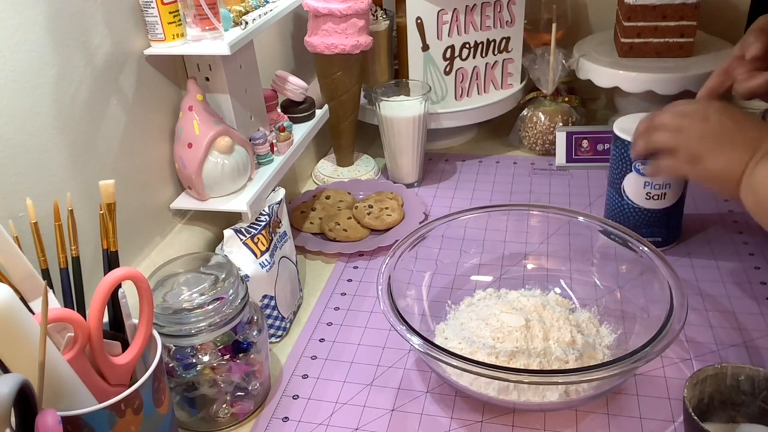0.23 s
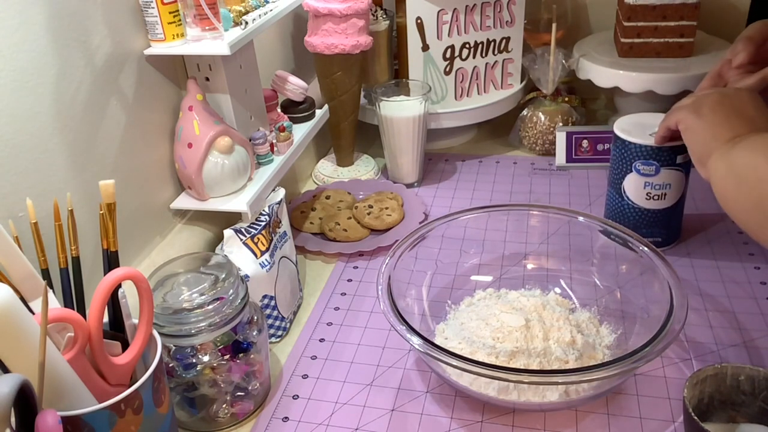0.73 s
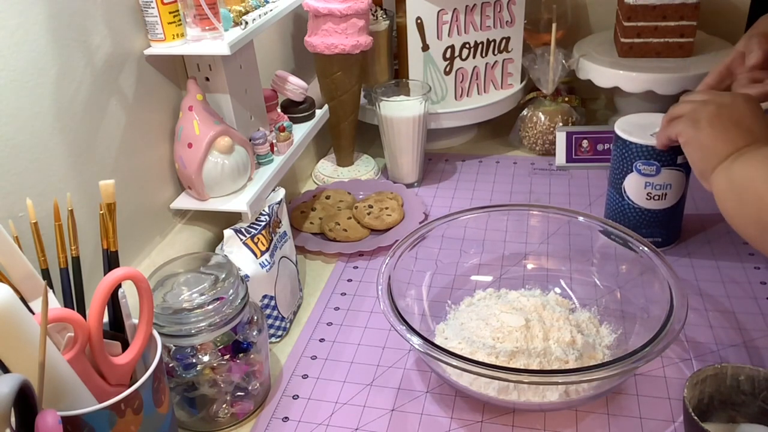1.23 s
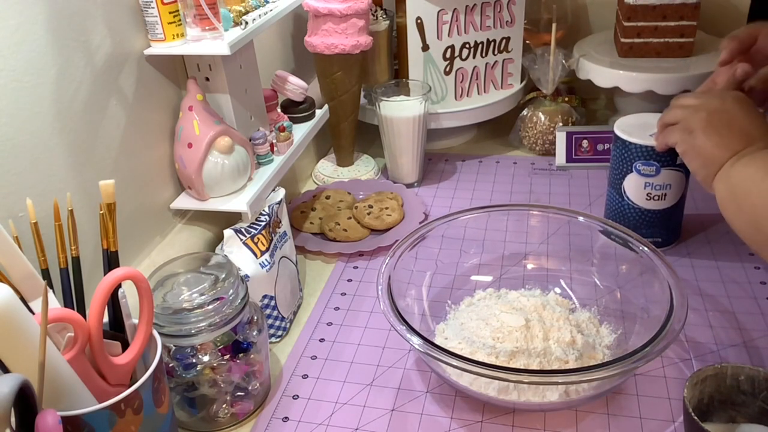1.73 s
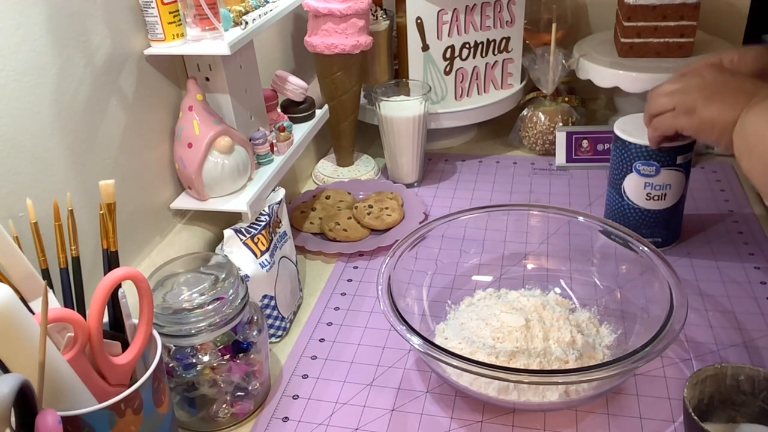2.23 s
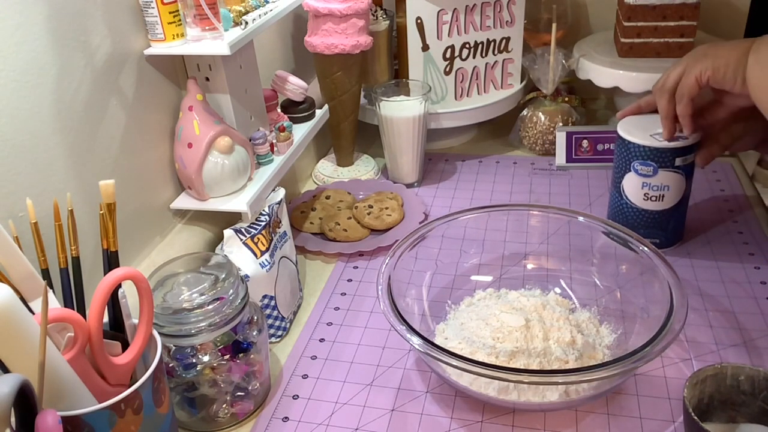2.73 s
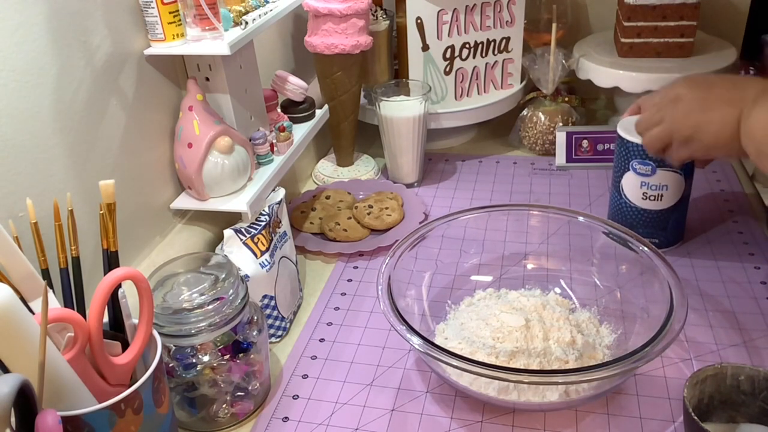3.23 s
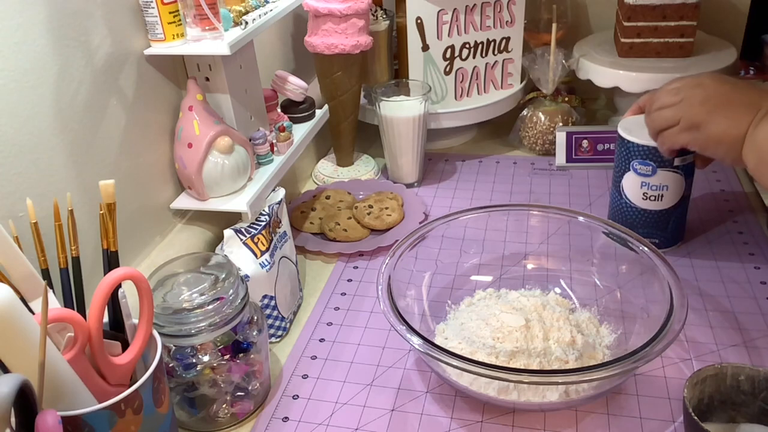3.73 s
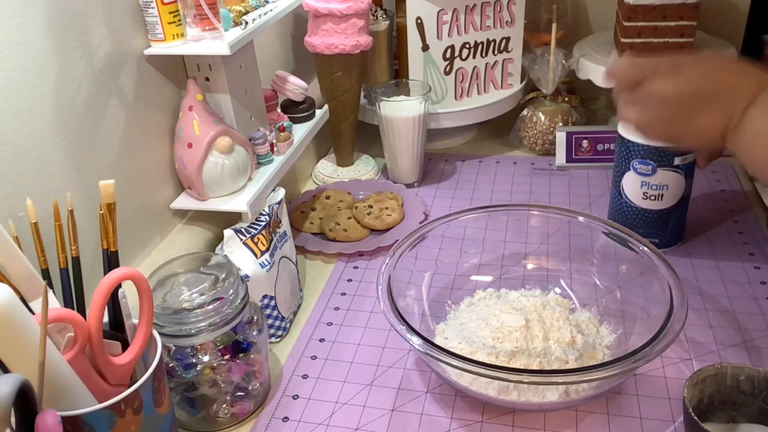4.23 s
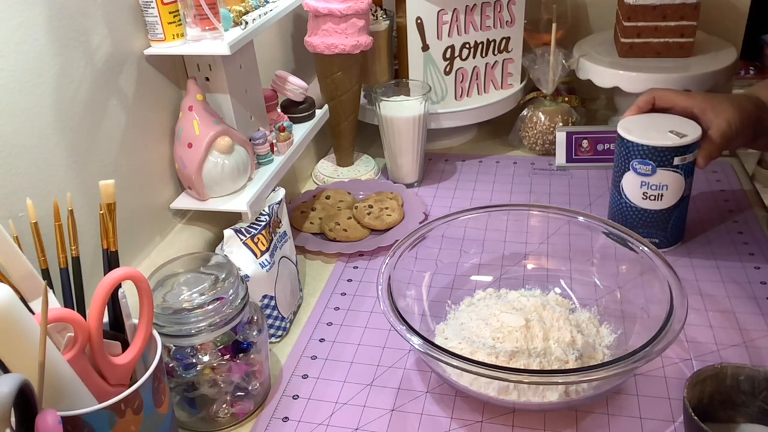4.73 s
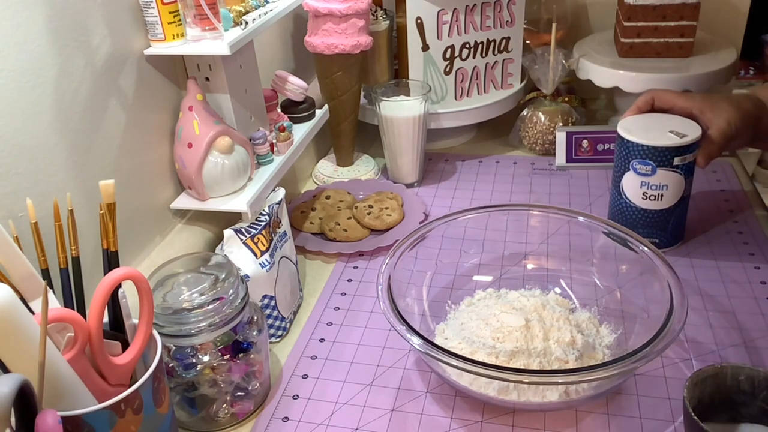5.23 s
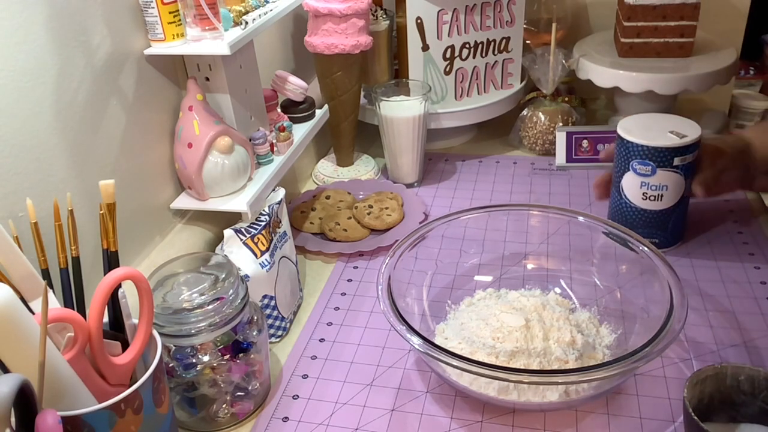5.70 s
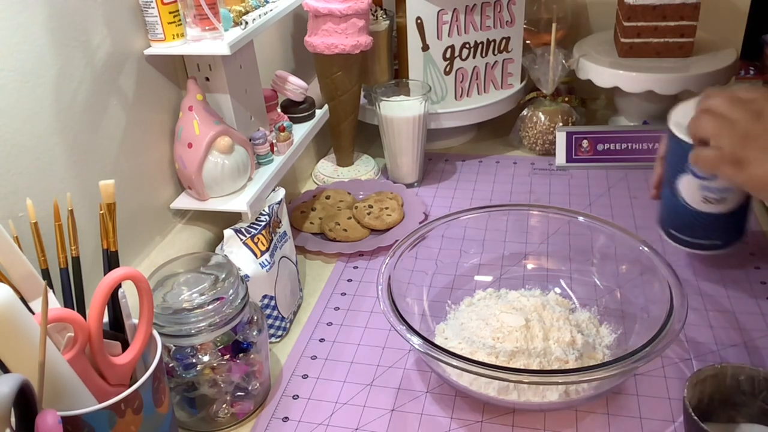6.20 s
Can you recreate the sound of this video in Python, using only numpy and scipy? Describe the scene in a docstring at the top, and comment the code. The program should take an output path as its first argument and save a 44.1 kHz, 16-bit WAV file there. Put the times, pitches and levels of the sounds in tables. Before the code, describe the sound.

Close in a small quiet room with a low hum, fingers brush faintly over a cardboard salt canister. Nails then pry at its metal spout: a cluster of sharp, bright snaps with hollow thumps near three seconds, more clicks and a scratch soon after, a lull, then a hard table knock with crisp ticks. It fades to near silence with one last faint touch.

```python
"""Fingernails pick at the metal spout of a cardboard salt canister on a craft table in a small quiet room.
Light finger strokes over lid and label come first, as noise of tiny slips through lid and drum resonances.
Then nails snap off the spout, bursts of crackle that make the hollow drum thump, with one short squeak
as a nail slips; among them the canister knocks on the table, as decaying modes, most sharply near the end.
A last faint stroke and knock close it. A low hum of shaped noise and two faint tones lie underneath."""
import sys
import numpy as np
from scipy import signal
from scipy.io import wavfile
from scipy.ndimage import uniform_filter1d

SR = 44100
rng = np.random.default_rng(int(sys.argv[2]) if len(sys.argv) > 2 else 0)


def digitize_waveform(pressure):
    """Quantize a signal to 16-bit integers and store it at the path in sys.argv[1].

    Rows of a 2-D input are taken as channels; values are limited to [-1, 1].
    """
    field = np.atleast_2d(pressure).T
    bounded = np.clip(field, -1, 1)
    quanta = np.round(bounded * 32767).astype(np.int16)
    wavfile.write(sys.argv[1], SR, quanta)


N = 284886  # length in samples

# Cardboard drum of the canister. Each row: mode in Hz, level in dB, ring time t60 in s.
DRUM_MODES = [(124, -16.5, 0.11), (165, -11, 0.12), (283, -3, 0.057), (318, -0.5, 0.034),
              (360, -3.5, 0.025), (402, 0.5, .06), (435, 12, 0.019), (525, -3.5, 0.034), (637, 4, 0.018),
              (853, -8.5, .04), (1200, -6.5, 0.041), (1437, -16, 0.051), (1780, -16, 0.04),
              (2500, -22.5, 0.018)]


def gain_of(db):
    """Decibels to amplitude."""
    return 10 ** (np.asarray(db) / 20)


def evened(x):
    """Scales to rms 1."""
    return x / np.sqrt(np.mean(x ** 2) + 1e-20)


def read(points, hz):
    """Reads a table on a log-frequency axis."""
    f, value = np.transpose(points)
    return np.interp(np.log(hz + 1), np.log(f + 1), value)


def add(mix, s, sound):
    """Mixes a sound in at time s, in seconds."""
    part = mix[round(s * SR):][:len(sound)]
    part += sound[:len(part)]


def resonate(x, hz, width):
    """Two-pole resonance with gain near 1 at its centre; width in Hz."""
    b, a = signal.iirpeak(min(hz, SR / 2.2), hz / width, SR)
    return signal.lfilter(b, a, x)


def snaps():
    """A nail snaps off the spout: a burst of fine crackle, then the drum's slower thump."""
    # Each row: start in seconds, crack peak in dB, brightest region in Hz,
    # rest of the band against that region in dB, drum thump in dB (rms of its first 12.5 ms).
    snap_rows = [(1.166, -55, 2040, -17, -54), (1.4394, -25.5, 2900, -2.5, -52),
                 (1.4688, -33.5, 9900, -2, -52), (1.6383, -44, 2060, -4, -41.5),
                 (1.643, -55, 1520, -7, -39.5), (1.8778, -34, 2100, 0, -46.5),
                 (1.918, -34.5, 1820, -17, -40), (2.358, -44.5, 1750, -10, -59),
                 (2.5354, -47, 1500, -10, -61), (2.5812, -31.5, 5750, 16, -58), (2.678, -31, 1588, 6, -73),
                 (2.8629, -7.5, 10200, -0.5, -24.5), (2.8658, -7.5, 1720, -9, -21.5),
                 (2.884, -12.5, 10210, -1, -37), (2.894, -2, 5200, 2.5, -25),
                 (3.0164, -4.5, 10360, 4.5, -11.5), (3.0444, -3, 1760, 11, -20.5),
                 (3.2157, -13.5, 6440, -2.5, -52), (3.236, -21.5, 5520, 0, -43),
                 (3.4191, -34.5, 1895, 1, -43), (3.479, -35.5, 8940, -14, -50),
                 (3.544, -9.5, 11570, -1.5, -26), (3.5628, -14, 8600, -21.5, -27.5),
                 (3.5733, -10, 7900, -8, -35.5), (3.8552, -35, 7680, 1, -76),
                 (3.8812, -39.5, 7770, -9.5, -63), (3.9893, -32, 2040, -11.5, -44.5),
                 (4.0074, -21, 1800, 6.5, -24.5), (4.1557, -33, 11000, 0.5, -73),
                 (4.205, -41, 8960, 6, -70), (4.3243, -40, 7360, -4, -70.5), (4.9995, -47.5, 9050, -3, -69),
                 (5.028, -53, 7000, -16.5, -70.5), (5.125, -42.5, 2030, -26.5, -67),
                 (5.2209, -19, 1950, -11.5, -44), (5.3165, -16, 7800, 0, -57),
                 (5.3382, -12.5, 13700, 5, -61), (5.466, -18.5, 11500, 8, -42.5),
                 (5.4794, -18.5, 7450, -7.5, -50.5), (5.5234, -28.5, 8800, -11.5, -56),
                 (5.62, -42, 4000, -10.5, -70), (5.7036, -23.5, 8660, 18, -54)]
    crack_t60_s, crack_rise_s, thump_lag_s = .048, 0.00018, .0015
    out = np.zeros(N)
    t = np.arange(SR // 8) / SR
    crack_shape = gain_of(-60 * t / crack_t60_s) * np.minimum(t / crack_rise_s, 1)
    for s, crack_db, hz, rest_db, thump_db in snap_rows:
        # grains of very uneven size
        grit = rng.standard_normal(len(t)) * gain_of(5 * rng.standard_normal(len(t)))
        burst = lid(grit * crack_shape)
        width = 0.82 * hz
        brightest = resonate(resonate(burst, hz, width), hz, width)
        crack = gain_of(rest_db) * burst + brightest
        add(out, s, gain_of(crack_db) * crack / abs(crack).max())
        thump = ring(DRUM_MODES, .5, cycles=1.0, crest_s=.0048)
        add(out, s + thump_lag_s, gain_of(thump_db) * thump)
    return out


def lid(x):
    """The lid's resonances over a flat part; each touch weights and shifts them a little differently."""
    # Lid and spout colour of cracks and scrapes. Each row: centre in Hz, width in Hz, level in dB.
    lid_modes = [(1997, 81, 2), (2730, 150, -7), (4026, 170, -3.5), (4790, 250, -6.5), (5607, 230, 0.5),
                 (6380, 280, -1.5), (7350, 150, -4), (8100, 300, -1), (9820, 1100, -8.5),
                 (11800, 650, -13.5), (13500, 710, -7)]
    weights = gain_of(4 * rng.standard_normal(len(lid_modes)))
    shifts = rng.uniform(.97, 1.03, len(lid_modes))
    out = gain_of(-3.5) * x
    for weight, shift, (hz, width, db) in zip(weights, shifts, lid_modes):
        out = out + weight * gain_of(db) * resonate(x, shift * hz, width)
    return out


def ring(modes, contact_ms, cycles, crest_s):
    """A smooth push sets the modes ringing; each swells over its own cycles, so bass comes late."""
    t = np.arange(SR // 3) / SR
    weights = gain_of(2.5 * rng.standard_normal(len(modes)))
    scatter = .12 * rng.standard_normal(len(modes))  # phase, in cycles
    tone = np.zeros(len(t))
    for weight, phase, (hz, db, t60) in zip(weights, scatter, modes):
        swell = (1 - np.exp(-t * hz / cycles)) ** 2
        decay = gain_of(db - 60 * t / t60)
        # the modes fall nearly into step at crest_s, where the push lets go
        tone -= weight * swell * decay * np.cos(2 * np.pi * (hz * (t - crest_s) + phase))
    push = np.hanning(max(round(contact_ms * SR / 1000), 3))
    pushed = np.convolve(tone, push)
    return pushed / np.sqrt(np.mean(pushed[:SR // 80] ** 2))


def strokes():
    """Skin drags dull, nails scratch bright, and the drum answers the pressure: rise, hold, fall."""
    # Each row: start of full pressure in seconds, rise, hold and fall in s, level of skin and nail in dB,
    # nail share of that level in dB, drum against that level in dB.
    stroke_rows = [(0.167, 0.094, .005, 0.17, -60.5, -2, -2), (0.294, 0.072, .05, .04, -55, -.5, -9),
                   (0.423, .025, .002, 0.02, -68.5, -10, 10),
                   (1.105, 0.051, 0.0022, 0.052, -48.5, -6, -7.5), (1.172, 0.026, .002, 0.047, -46, -32, 0),
                   (1.268, .03, 0.062, 0.089, -57, -35, 5.5), (1.433, .02, 0.0022, 0.022, -61, -25, 2),
                   (1.467, .005, .002, 0.058, -50, -3, -8), (1.636, 0.012, 0.038, 0.04, -61, -0.5, 8),
                   (1.863, .016, 0.067, 0.029, -54, -3, -4.5), (2.151, .066, 0.12, 0.037, -64.5, -12, 4),
                   (2.245, .015, .05, .06, -58, -.6, -5), (2.379, 0.039, 0.0022, 0.16, -51.5, -7, -2),
                   (2.48, .05, .012, .04, -58, -4, 1.5), (2.548, .03, .002, .012, -64, -9, 10),
                   (2.6, 0.031, 0.0019, 0.048, -40.5, 4, -8), (2.688, 0.026, 0.035, 0.04, -46, 2.5, -10),
                   (2.843, 0.067, 0.029, 0.0065, -56, -2, -3.5),
                   (3.207, 0.0091, .008, 0.0044, -50, -12, -2),
                   (3.401, 0.0058, 0.14, .012, -49.5, -0.1, -8.5),
                   (3.567, 0.018, 0.0018, 0.015, -18, 4, -4.5), (3.611, 0.02, 0.014, 0.13, -47.5, 0, -8.5),
                   (3.741, .11, 0.17, .05, -54.5, -1.3, -14), (3.966, .07, 0.01, .012, -50, -1, -11.5),
                   (4.017, 0.025, 0.021, 0.021, -22.5, -1, -12.5), (4.067, 0.011, 0.1, 0.049, -52, -1, -17),
                   (4.278, 0.026, 0.06, 0.037, -54.5, -0.9, -12),
                   (4.526, .017, .002, 0.0284, -65.5, 0.5, -3.5),
                   (5.2093, .002, 0.0074, .012, -43, -2.5, 2), (5.224, .006, 0.0097, 0.01, -33.5, 0.5, 4),
                   (5.341, 0.053, 0.0014, 0.024, -31, -1.2, -5.5), (5.453, 0.023, 0.02, .03, -34, -1.2, -7),
                   (5.529, 0.023, 0.0031, 0.038, -48, -1.5, -1.5), (5.543, 0.01, .15, .05, -55, -.6, -5),
                   (5.665, .012, .021, .03, -56, -12, 3), (5.709, 0.015, .002, 0.085, -55, -10, -12),
                   (6.3, 0.057, 0.072, 0.096, -75, -15, 9)]
    edge_db = 20  # a stroke gains this much over its rise and loses it over its fall
    skin_low = signal.butter(2, 1100, "highpass", fs=SR, output="sos")
    skin_high = signal.butter(4, 3600, fs=SR, output="sos")
    skin = np.vstack([skin_low, skin_high])
    nail = signal.butter(2, 5000, "highpass", fs=SR, output="sos")
    out = np.zeros(N)
    for s, rise, hold, fall, level_db, nail_db, drum_db in stroke_rows:
        rise, hold, fall = np.maximum([rise, hold, fall], .001)
        t = np.arange(max(-2 * rise, -s), hold + 2 * fall, 1 / SR)
        below_db = edge_db * (np.maximum(-t, 0) / rise + np.maximum(t - hold, 0) / fall)
        share = min(gain_of(nail_db), .97)  # some skin always remains
        dull = np.sqrt(1 - share ** 2) * evened(signal.sosfilt(skin, wandering(len(t))))
        bright = share * evened(signal.sosfilt(nail, wandering(len(t))))
        pressure = slips(len(t))
        # 3.4 / t60 makes the modes broader, so they die sooner than in a snap
        drum = evened(sum(gain_of(db) * resonate(pressure, hz, 3.4 / t60) for hz, db, t60 in DRUM_MODES))
        touch = dull + bright + gain_of(drum_db) * drum
        add(out, s + t[0], gain_of(level_db - below_db) * touch)
    return out


def wandering(count):
    """Slips whose colour drifts as the finger moves from one patch of the lid to another."""
    turns_per_s = 4.5
    place = np.cumsum(np.full(count, 2 * np.pi * turns_per_s / SR)) + 2 * np.pi * rng.random()
    return np.cos(place) * lid(slips(count)) + np.sin(place) * lid(slips(count))


def slips(count):
    """Dense tiny slips of uneven size that come in clumps, with a few sharp catches."""
    # smoothing over about 3 ms and 16 ms
    clumps_db = 1.96 * evened(uniform_filter1d(rng.standard_normal(count), 120))
    surges_db = 1.5 * evened(uniform_filter1d(rng.standard_normal(count), 700))
    catches = 1 + 2.9 * (rng.random(count) < 300 / SR)  # about 300 per second
    size_db = 1.6 * rng.standard_normal(count) + clumps_db + surges_db
    return rng.standard_normal(count) * catches * gain_of(size_db)


def squeak():
    """A nail slips down the spout: slips through a narrow resonance that slides down under one arch."""
    start_s, length_s, level_db = 2.682, .075, -52
    from_hz, to_hz, width_hz = 1950, 1250, 180
    u = np.arange(0, 1, 1 / (SR * length_s))  # 0 to 1 through the squeak
    glide_hz = from_hz * (to_hz / from_hz) ** u
    turn = np.exp(2j * np.pi * np.cumsum(glide_hz) / SR)
    # shift the gliding centre to 0 Hz, smooth there, and shift back
    keep = np.exp(-np.pi * width_hz / SR)
    smoothed = signal.lfilter([1 - keep], [1, -keep], slips(len(u)) / turn)
    band = (turn * smoothed).real
    out = np.zeros(N)
    add(out, start_s, gain_of(level_db) * np.sin(np.pi * u) ** 0.42 * evened(band))
    return out


def knocks():
    """The canister's rim lands or rocks on the table top; a soft long contact gives only bass."""
    # Each row: start in seconds, level in dB (rms of the first 12.5 ms), contact time in ms.
    knock_rows = [(1.451, -53.5, 4.4), (1.648, -44, 4.4), (2.614, -49.5, 4.8), (2.681, -50, 5.1),
                  (3.07, -46, 4.5), (3.15, -49, 3.6), (3.417, -45, 2.5), (3.585, -50, 4.9),
                  (5.221, -20.5, 0.42), (5.229, -24.5, 1.5), (5.443, -29.5, 2.88), (5.711, -48.5, 4.6),
                  (5.732, -51.5, 2.2), (6.304, -53, 1.65), (6.318, -53, 0.58)]
    # Table top. Each row: mode in Hz, level in dB, ring time t60 in s.
    table_modes = [(109, -10, 0.12), (127.4, -5, .08), (159, -10, 0.067), (190, -6.5, 0.063),
                   (300, -14.5, 0.089), (386, -13, 0.067), (507, 0.5, 0.034), (574, -1, 0.043),
                   (684, -11.5, 0.034), (760, -5, 0.037), (953, -2, 0.034), (1230, -5, 0.021),
                   (1410, -4, 0.022), (1900, -8, .014)]
    out = np.zeros(N)
    for s, db, contact_ms in knock_rows:
        add(out, s, gain_of(db) * ring(table_modes, contact_ms, cycles=1.2, crest_s=0.0014))
    return out


def room(x):
    """Room echo: sparse taps of random sign, each band dying at its own speed."""
    # Each row: frequency in Hz, decay time t60 in s.
    room_decay = [(100, 0.22), (300, 0.24), (1000, 0.24), (4000, 0.3), (12000, 0.25)]
    taps = np.zeros(SR // 2)
    at = np.arange(100, SR // 2 - 12, 12)
    taps[at + rng.integers(0, 12, len(at))] = rng.choice([-1., 1.], len(at))
    hz, t, z = signal.stft(taps, SR, nperseg=256)
    decay = gain_of(-60 * t / read(room_decay, hz)[:, None])
    tail = signal.istft(z * decay, SR, nperseg=256)[1]
    return signal.fftconvolve(x, tail / np.linalg.norm(tail))[:N]


def hum():
    """Low hum: random short-time spectra with mild drifting patches, plus faint steady tones."""
    # Noise colour before levelling. Each row: frequency in Hz, relative density in dB per Hz.
    hum_colour = [(26, -33), (45, -4), (70, 1), (206, -10.5), (276, -9), (379, -13), (484, -12.5),
                  (735, -21.5), (851, -16.5), (938, -27.5), (1570, -25), (2210, -33), (3440, -35),
                  (4290, -40), (15700, -41.5)]
    # Steady faint tones. Each row: frequency in Hz, level in dB rms.
    whine_tones = [(3502, -85), (3680, -93.5)]
    hum_db = -58  # rms of the noise
    frames, hz = N // 256 + 5, np.fft.rfftfreq(1024, 1 / SR)
    a, b, patches = rng.standard_normal((frames, 513, 3)).T
    # smooth over 6 frequency bins and 16 frames
    patches = evened(uniform_filter1d(uniform_filter1d(patches, 6, 0), 16, 1))
    colour_db = read(hum_colour, hz)[:, None] + 1.2 * patches
    z = (a + 1j * b) * gain_of(colour_db)
    noise = signal.istft(z, nperseg=1024, noverlap=768)[1][:N]
    t = np.arange(N) / SR
    tones = sum(np.sqrt(2) * gain_of(db) * np.sin(2 * np.pi * f * t) for f, db in whine_tones)
    return gain_of(hum_db) * evened(noise) + tones


def scene():
    """Hands and canister, their room echo and the hum."""
    room_db = -11  # echo against the direct sound
    near = snaps() + strokes() + squeak() + knocks()
    return (near + gain_of(room_db) * room(near) + hum())[None]


def record(dry):
    """Bass roll-off of the microphone, then the band limit."""
    bass_hz, edge_hz = 52, 15900
    cut = signal.sosfilt(signal.butter(5, bass_hz, "highpass", fs=SR, output="sos"), dry)
    band_limit = signal.firwin(511, edge_hz, window=("kaiser", 9), fs=SR)
    return signal.oaconvolve(cut, band_limit[None], "same")


dry = scene()
out = record(dry)
digitize_waveform(out)
```